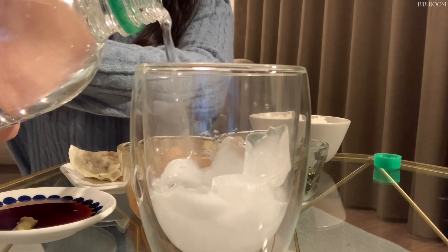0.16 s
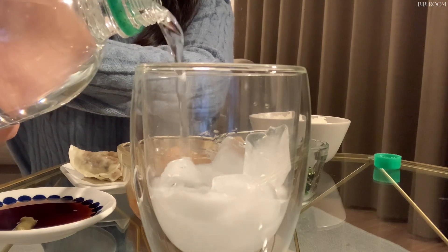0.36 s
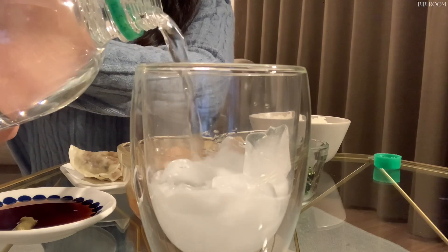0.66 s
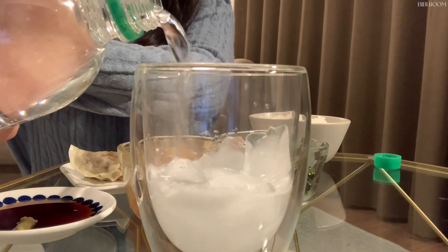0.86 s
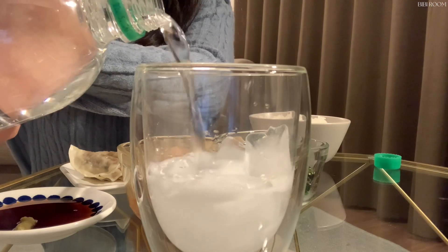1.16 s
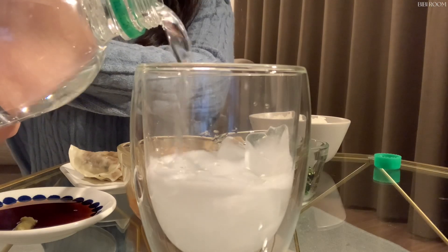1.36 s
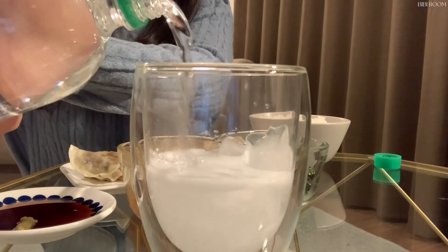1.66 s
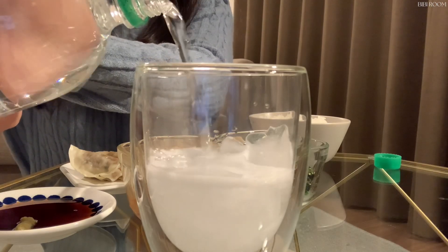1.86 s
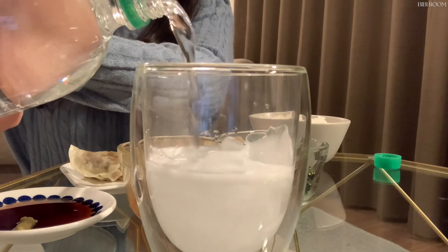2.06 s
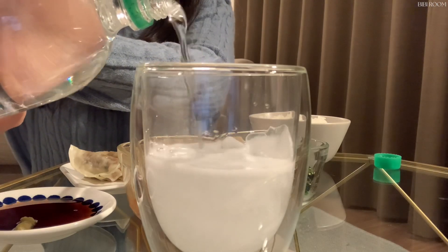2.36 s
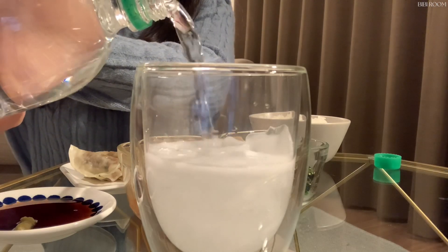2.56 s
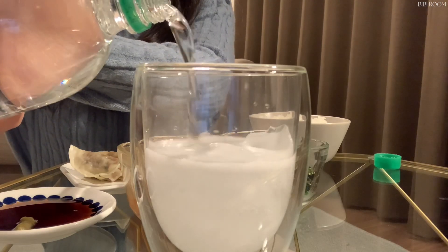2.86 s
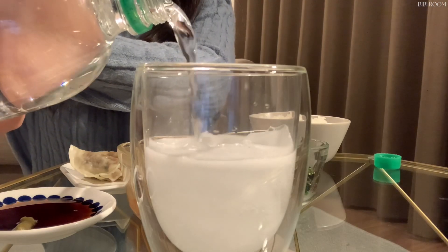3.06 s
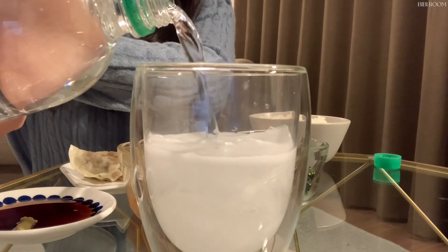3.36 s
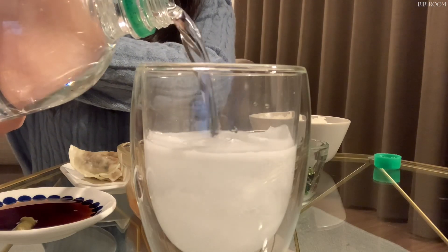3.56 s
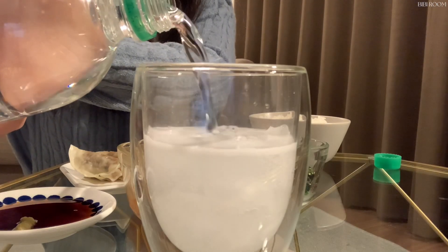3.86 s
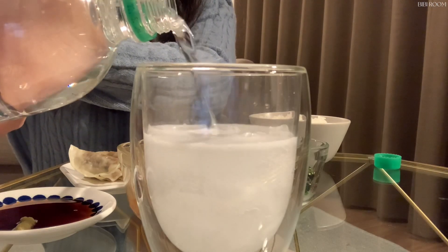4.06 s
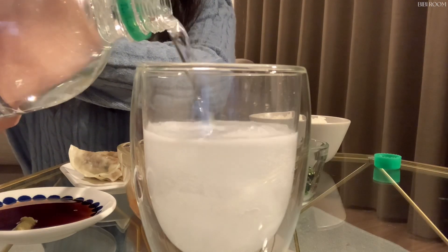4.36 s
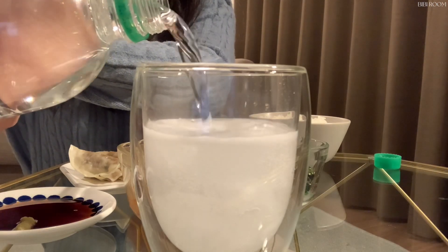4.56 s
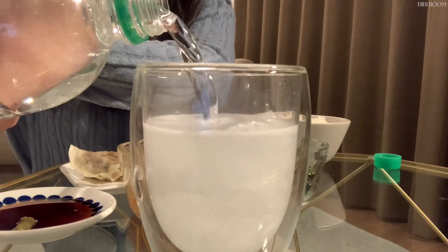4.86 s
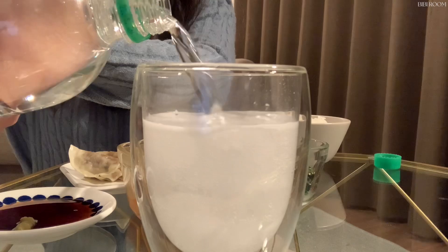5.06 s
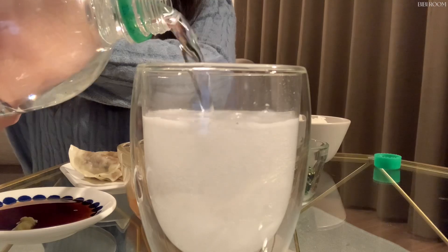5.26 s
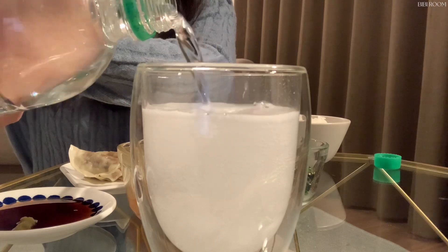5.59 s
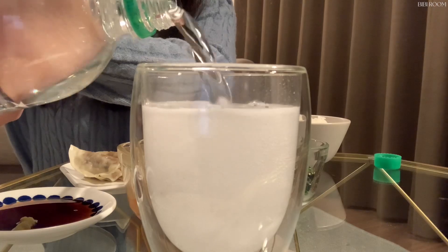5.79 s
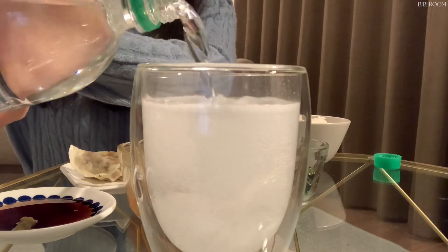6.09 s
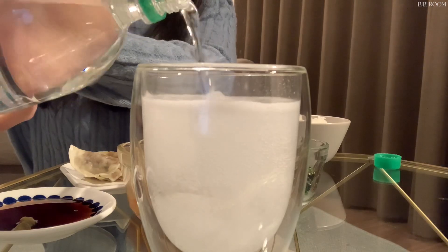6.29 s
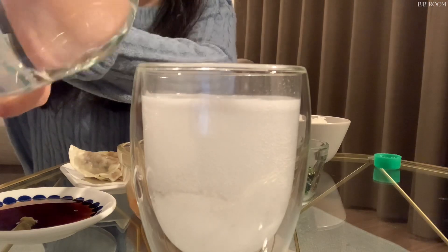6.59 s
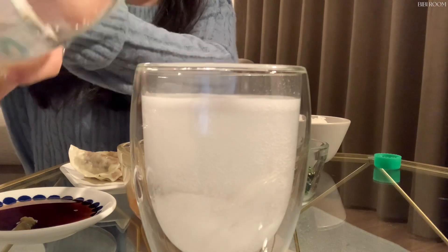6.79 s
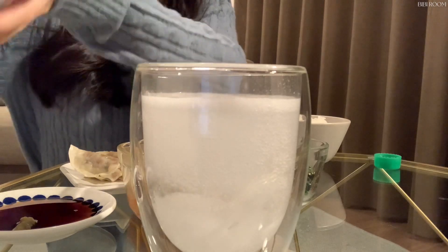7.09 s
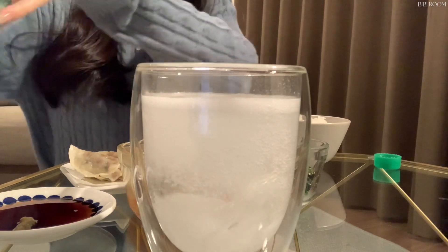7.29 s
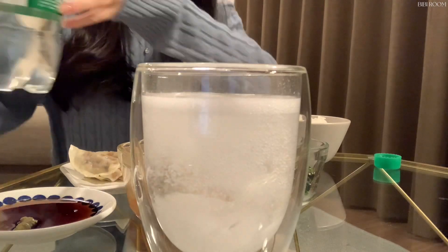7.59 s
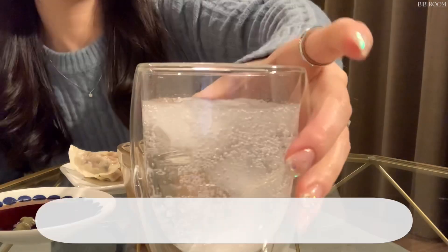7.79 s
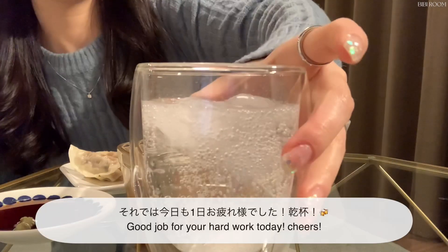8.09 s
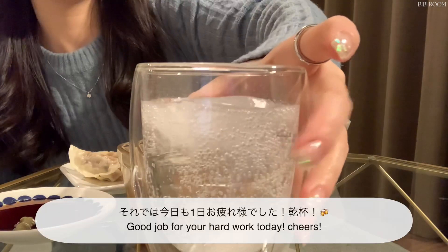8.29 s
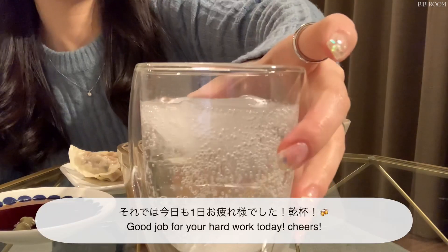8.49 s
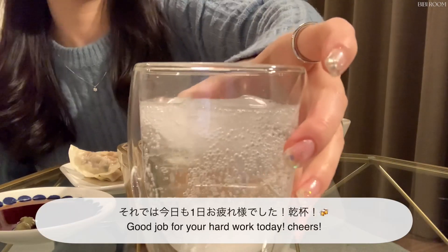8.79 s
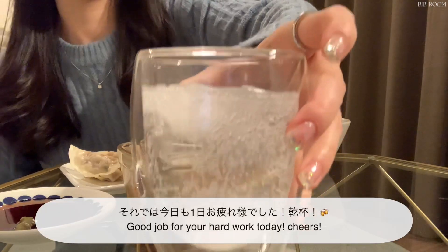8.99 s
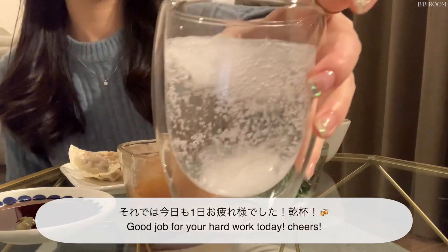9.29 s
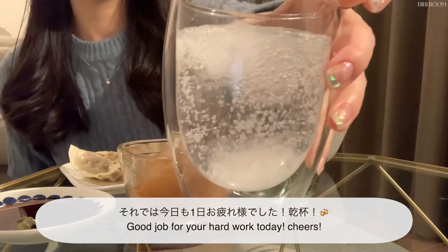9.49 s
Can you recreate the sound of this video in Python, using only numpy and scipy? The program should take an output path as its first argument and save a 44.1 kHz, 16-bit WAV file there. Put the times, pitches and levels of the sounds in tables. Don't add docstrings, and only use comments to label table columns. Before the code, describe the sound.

A steady, bright fizz surrounds the microphones as carbonated water is poured into an iced glass indoors. The splash strengthens and brightens, bottle gulps bubble underneath, and ice clunks irregularly, hardest just before the pour ends. Foam keeps seething briefly, then an abrupt cut leaves little but low room drone, a few damped glass clinks from gripping fingers, a slight skin rustle and delicate crackling bubbles.

```python
import sys
import numpy as np
from scipy import signal
from scipy.fft import rfft, irfft, next_fast_len
from scipy.io import wavfile
from scipy.ndimage import uniform_filter1d, map_coordinates

SR = 44100
rng = np.random.default_rng(int(sys.argv[2]) if len(sys.argv) > 2 else 0)


def attenuation_scalar(level_db):
    decades = np.asarray(level_db, float) / 20
    return 10 ** decades


def to_wav(sig):
    pcm = np.clip(np.atleast_2d(sig), -1, 1) * 32767
    pcm = np.round(pcm).astype(np.int16)
    wavfile.write(sys.argv[1], SR, pcm.T)


N = 425124
CHANGE_S = 7.697


# time_s, depth_tone_hz, width_hz
AIR_SPACE = [(0, 1070, 340), (1.5, 1220, 330), (3, 1250, 440), (4.5, 1520, 580), (5.5, 1780, 950),
             (6.4, 1970, 1320), (7.7, 1560, 1300)]
# pitch_hz, width_hz, level_db, share of the depth tone (0-1)
CROSS_TONES = [(2693, 232, 2.5, 0.64), (3006, 350, -4, 1), (4425, 193, -4.5, 0.58)]
# pitch_hz, level_db
FOAM_SPECTRUM = [(900, -22), (1800, -9), (2400, -13.5), (3600, 6.5), (5300, -3.5), (6300, 2.5), (7400, 0),
                 (8000, -5), (8700, -.5), (9300, -3), (10200, -1.5), (11300, -10), (12500, -15.5),
                 (13500, -18.5)]
# pitch_hz, level_db
SPRAY_SPECTRUM = [(6500, -20), (7400, -3), (8000, -8), (8800, -1), (10000, -3), (11500, -5), (12800, -5),
                  (14000, 0), (15000, -1), (16000, -1)]


def fizz():
    depth_db, cross_db, foam_db, spray_db = strengths()
    s, hz, width = np.transpose(AIR_SPACE)

    def depth(f, t):
        return peak(f, np.interp(t, s, hz), np.interp(t, s, width)) ** 1.3

    def cross(f, t):
        total = 0
        broadening = (np.interp(t, s, width) / width[0]) ** 0.43
        for k, (cross_hz, cross_width, db, share) in enumerate(CROSS_TONES):
            tone_hz = np.hypot(cross_hz, share * np.interp(t, s, hz))
            total = total + (-1) ** k * attenuation_scalar(db) * peak(f, tone_hz, cross_width * broadening)
        return total

    def foam(f, t):
        return attenuation_scalar(along(FOAM_SPECTRUM, f))

    def spray(f, t):
        return attenuation_scalar(along(SPRAY_SPECTRUM, f))

    splash_db = 0.9 * wobble(17)
    depth_db_now = depth_db + 5 + splash_db + 1.2 * wobble(40)
    cross_db_now = cross_db + 3.5 + splash_db + 0.84 * wobble(30)
    foam_db_now = foam_db + 7.5 + 0.48 * splash_db + 0.33 * wobble(10)
    spray_db_now = spray_db + 7.5 + 0.24 * splash_db + 0.8 * wobble(17)
    pair = attenuation_scalar(depth_db_now) * patchy(pops(900, spread_db=4.5, share=0.38), 1.3, depth)
    pair += attenuation_scalar(cross_db_now) * patchy(pops(1500, spread_db=1.0, share=0.62), 1.3, cross)
    pair += attenuation_scalar(foam_db_now) * patchy(pops(4000, spread_db=2.5, share=0.41), 2.37, foam)
    pair += attenuation_scalar(spray_db_now) * patchy(pops(3500, spread_db=1, share=0.78), 0.9, spray)
    pair[0] += pings(depth_db, cross_db, foam_db)
    return ports(*pair)


# time_s, plunging_stream_db, bursting_froth_db
FLOW_LEVELS = [(0, -59, -62), (.5, -57, -63.5), (1.2, -54.5, -62.5), (1.7, -51.5, -62), (2.1, -50, -59.5),
               (2.8, -50, -58.5), (3.8, -49.5, -57.5), (4.6, -49, -55), (5.44, -47, -55),
               (6.1, -50.5, -54.5), (6.5, -48.5, -53.5), (6.8, -53.5, -52.5), (7.5, -52, -54)]
# depth tone, cross tones, foam, spray [dB]
SETTLED_LEVELS = [-90, -99, -93, -82.5]
# peak_s, rise_s, fall_s, level_db
SLOSHES = [
    (8.23, 0.15, 0.089, -70),
    (8.3, 0.029, 0.027, -70),
    (8.3, .25, 0.28, -86.5),
    (8.58, 0.28, 0.14, -81),
]


def strengths():
    (stream_db, froth_db), hz = curves(FLOW_LEVELS), curves(AIR_SPACE)[0]
    depth_db = both(stream_db + 0.5 - 11 * np.log2(hz / hz[0]), froth_db - 2)
    melting_bed_db = -57.5 - 1.36 * np.arange(N) / SR
    swinging_bed_db = -58 + 1.4 * (froth_db - np.median(froth_db))
    foam_db = both(melting_bed_db, swinging_bed_db)
    settled = [both(db, surge(*jolt)) for db, jolt in zip(SETTLED_LEVELS, SLOSHES)]
    return takes([depth_db, stream_db, foam_db, froth_db], settled)


def pops(per_s, spread_db, share):
    chance = per_s / SR * takes(1, 0.45)
    burst = (rng.random((2, N)) < chance) / np.sqrt(chance)
    uneven_db = spread_db * np.minimum(rng.exponential(size=(2, N)), 2.2)
    size = rng.standard_normal((2, N)) * attenuation_scalar(uneven_db)
    return share * unit(burst * size) + np.sqrt(1 - share ** 2) * rng.standard_normal((2, N))


def patchy(x, patchy_db, response):
    f, t, z = signal.stft(x, SR, nperseg=1024)
    field = rng.standard_normal(z.shape[1:])
    field = uniform_filter1d(uniform_filter1d(field, size=8, axis=0), size=4, axis=1)
    z = z * response(f[:, None], t) * attenuation_scalar(patchy_db * unit(field))
    return unit(signal.istft(z, SR, nperseg=1024)[1][:, :N])


BUBBLE_HZ = [2030, 2870, 3500, 4550, 4440, 6250, 7030, 7230, 8970, 10300]


def pings(depth_db, cross_db, foam_db):
    draw = rng.random((1400, 5))
    start = (draw[:, 0] * (N - 700)).astype(int)
    mode = (draw[:, 1] * len(BUBBLE_HZ)).astype(int)
    hz = (np.array(BUBBLE_HZ)[mode] * (1 + 0.079 * (draw[:, 2] - 0.5)))[:, None]
    fizz_db = [depth_db[start] + 5.0, cross_db[start] - 4.5, foam_db[start] + 3.5]
    db = np.choose(np.digitize(mode, [1, 5]), fizz_db)
    db = db + 5 * (start > CHANGE_S * SR)
    db = db[:, None]
    t = np.arange(640) / SR
    ring = np.sin(2 * np.pi * hz * t * (1 + 3.4 * t)) * attenuation_scalar(-60 * t * hz / 45) * (1 - np.exp(-t / 0.0004))
    ring = ring * attenuation_scalar(db - 4.0 * np.log(draw[:, 3] + 0.074)[:, None])
    return np.bincount((start[:, None] + np.arange(len(t))).ravel(), ring.ravel(), N)


# start_s, level_db, pitch_hz
BOTTLE_GLUGS = [(0.225, -37, 296), (0.52, -42, 293), (0.756, -39, 268), (1.027, -46, 266),
                (1.273, -39, 263), (1.569, -38.5, 267), (1.914, -40, 265), (2.372, -39.5, 261),
                (2.78, -47, 303), (4.149, -42, 202), (5.168, -41, 187), (5.617, -38, 202),
                (5.963, -38.5, 209)]


def glugs():
    track = np.zeros(N)
    for s, db, hz in BOTTLE_GLUGS:
        add(track, s, attenuation_scalar(db + 3) * swell(0.914 * hz, life=0.0061, rise=0.033))
    return track


def swell(hz, life, rise):
    t = np.arange(6000) / SR
    return np.sin(2 * np.pi * hz * t * (1 + rise * t / life)) * t / life * np.exp(1 - t / life)


# start_s, level_db, pitch_hz, breadth_octaves
ICE_BLOWS = [(1.196, -30, 1080, 0.38), (1.754, -21.5, 1250, 0.64), (1.881, -39, 1480, 0.32),
             (2.095, -28.5, 1595, 0.89), (2.179, -29.5, 1670, .65), (2.201, -33.5, 1160, 0.96),
             (2.314, -28.5, 1200, .9), (2.728, -29, 1150, 0.49), (2.8, -23, 1290, 0.79),
             (2.858, -34, 1220, 0.71), (3.237, -28, 1400, 0.85), (3.27, -20.5, 1170, 0.85),
             (3.284, -27, 1210, 0.79), (3.396, -33, 1200, 0.7), (3.463, -28, 1340, 0.52),
             (3.658, -34, 990, 0.35), (3.684, -31, 1490, 1), (4.423, -31, 1230, .55),
             (4.728, -30, 1210, 0.52), (4.779, -23.5, 1390, 0.67), (4.849, -31.5, 1780, 1),
             (4.909, -31.5, 1250, 0.54), (5.452, -34, 1840, 1), (5.526, -33, 2100, 0.29),
             (5.699, -18, 1300, 0.93), (5.888, -13, 1600, 0.96), (6.33, -27, 1650, .95),
             (6.39, -27, 1090, .4), (6.46, -32, 1840, 1), (6.529, -30, 2060, 1)]


def ice_knocks():
    track = np.zeros(N)
    for s, db, hz, octaves in ICE_BLOWS:
        t60 = 0.021 / octaves ** 0.7
        add(track, s, attenuation_scalar(db + 2.5) * knock(hz, t60, octaves))
        add(track, s + 0.015, attenuation_scalar(db - 14 - 5 * octaves) * knock(hz, t60, octaves))
    return track


WALL_MODES_HZ = [723, 984, 1200, 1474, 1780, 2100, 2285, 2993, 3430, 4630]


def knock(hz, t60, octaves):
    t = np.arange(2048) / SR
    count = len(WALL_MODES_HZ)
    modes = np.array(WALL_MODES_HZ)[:, None] * (1 + 0.05 * rng.standard_normal((count, 1)))
    db = -6.5 * (np.log2(modes / hz) / max(octaves, 0.15)) ** 2 + rng.normal(0, 1.0, modes.shape)
    since = np.maximum(t - 0.000867 * (1200 / modes - 0.4), 0)
    ring = attenuation_scalar(db - 60 * since / t60) * np.sin(2 * np.pi * modes * since) * (1 - np.exp(-since / 0.000855))
    return ring.sum(0) / abs(ring.sum(0)).max()


# start_s, level_db, middle_modes_db, high_modes_db, bright_tick_db
RING_TAPS = [(7.997, -66, -6, -4, -14), (8.007, -40, -12, -10.5, -19), (8.085, -43.5, -16, -27, -20),
             (8.136, -31.5, -24, -24.5, -14), (8.147, -41, -9, -10, -19), (8.192, -40.5, -13, -29, -28),
             (8.248, -50.5, -11, -29, -15), (8.285, -60, -19, -19, -36), (8.288, -42, -22, -19, -37),
             (8.297, -44.5, -26, -12, -30), (8.496, -59, -19, -28, -24), (9.31, -66, -18, -40, -40)]


def ring_taps():
    track = np.zeros(N)
    for s, db, middle_db, high_db, tick_db in RING_TAPS:
        add(track, s, attenuation_scalar(db + 3.5) * clink(middle_db, high_db))
        add(track, s, attenuation_scalar(db + tick_db + 10) * tick(7000, width=0.37))
    return track


# pitch_hz, level_db, t60_s
GLASS_MODES = [(770, -7, .016), (1000, 12, 0.013), (1200, 5, 0.015), (1520, -0.5, 0.0087),
               (4640, -34.5, 0.0056)]


def clink(middle_db, high_db):
    t = np.arange(2048) / SR
    bend = t + 0.00022 * (1 - np.exp(-t / 0.00039))
    middle = [(2000, middle_db + 3, 0.01), (2380, middle_db + 7, 0.018)]
    high = [(3250, high_db + 9, 0.013), (3600, high_db + 11, 0.013)]
    ring = np.zeros(len(t))
    for hz, db, t60 in GLASS_MODES + middle + high:
        decay = attenuation_scalar(db + rng.normal(0, 2.1) - 60 * t / t60)
        ring += decay * np.sin(2 * np.pi * hz * rng.normal(1, 0.034) * bend)
    ring *= 1 - np.exp(-t / 0.00082)
    return ring / abs(ring).max()


# start_s, level_db, pitch_hz
SNAPS = [(3.2292, -37, 5540), (4.6664, -50, 3070), (5.4562, -34.5, 3100), (6.07, -29.5, 5200),
         (7.8293, -66, 2300), (7.889, -66, 4640), (7.9147, -64, 14100), (8.3779, -65, 4720),
         (8.3994, -65, 4550), (8.5545, -63, 13700), (8.569, -56.5, 13600), (8.6448, -66, 12400),
         (8.749, -62, 7460), (8.869, -55, 13300), (8.991, -67, 14700), (9.2324, -71, 14300),
         (9.276, -68, 11000), (9.616, -61, 6990)]


def bubble_snaps():
    track = np.zeros(N)
    for s, db, hz in SNAPS:
        noise_share = 0.4 * hz / 6000 + 0.38 * attenuation_scalar(db + 29.5) ** 2
        add(track, s, attenuation_scalar(db - 4.5) * tick(hz, noise_share))
    return track


def tick(hz, width):
    t = np.arange(512) / SR
    return (np.sin(2 * np.pi * hz * t) + width * rng.standard_normal(len(t))) * attenuation_scalar(-60 * t / 0.0098)


# peak_s, rise_s, fall_s, level_db
GRIP_SURGE = (8.4, .14, .14, -82)
# pitch_hz, width_hz, level_db
SKIN_TONES = [(3160, 200, -10.5), (4660, 330, 1), (7220, 300, 1), (8870, 350, -5.5), (10530, 370, -10)]


def grip():
    def tones(f):
        return sum(attenuation_scalar(db) * peak(f, hz, width) ** 2 for hz, width, db in SKIN_TONES)

    slip_db = both(surge(*GRIP_SURGE), -104) + 4.2 * wobble(45) + 2.8 * wobble(9)
    slip = attenuation_scalar(slip_db) * takes(0, 1)
    return ports(*(slip * unit(filtered(rng.standard_normal((2, N)), tones))))


# start_s, level_db, pitch_hz, rise_s
HAND_THUMPS = [
    (8.023, -36, 60.2, 0.013),
    (8.105, -42, 68.4, 0.014),
]


def thumps():
    track = np.zeros(N)
    for s, db, hz, life in HAND_THUMPS:
        add(track, s, attenuation_scalar(db - 2) * swell(hz, life, rise=0.013))
    return track


# pitch_hz, t60_s
ROOM_DECAY = [(300, 0.34), (2000, 0.13), (10000, 0.27)]


def walls(x):
    hz, t, z = signal.stft(rng.standard_normal((2, SR // 2)), SR, nperseg=256)
    tail = signal.istft(z * attenuation_scalar(-60 * t / along(ROOM_DECAY, hz)[:, None]), SR, nperseg=256)[1]
    delayed = np.pad(x, (200, 0))[None]
    return signal.fftconvolve(delayed, tail / np.linalg.norm(tail[0]), axes=1)[:, :N]


# pitch_hz, width_hz, level_db
ROOM_MODES = [(41.7, 13, -7), (66.6, 15.3, -1), (75.7, 11.8, -5.5)]
# time_s, level_db
DRONE_SWELLS = [(0, -45), (.6, -49), (1.63, -47.5), (1.93, -52), (2.78, -42.5), (3.21, -50), (3.57, -48),
                (3.94, -43.5), (4.1, -50), (4.58, -51), (5.1, -44), (5.48, -56.5), (5.68, -41),
                (6.02, -51.5), (6.4, -42), (6.87, -50), (7.43, -42), (7.69, -50.5)]
# pitch_hz, density_db (per Hz)
AIR_SPECTRUM = [(53, -40.5), (90, -0.5), (107, -8.5), (139, -3), (184, -12), (225, -8.5), (248, -15),
                (298, -14), (406, -12), (441, -11.5), (474, -14), (1040, -18), (2600, -47.5), (3380, -72),
                (5720, -120)]
# pitch_hz, width_hz, level_db
RUSH_TONES = [(136.5, 14, 2), (291, 74, 2)]


def room():
    t, noise = np.arange(N) / SR, rng.standard_normal((2, 2, N))
    drone_db = takes(curves(DRONE_SWELLS)[0], -53.5 - 2.5 * (t - CHANGE_S))
    air_db = takes(-49.5 + 0.46 * t, -59) + 0.75 * wobble(6)

    def modes(f):
        return sum(attenuation_scalar(db) * peak(f, hz, width) ** 2 for hz, width, db in ROOM_MODES)

    def colour(f):
        tones = sum(attenuation_scalar(db) * abs(peak(f, hz, width)) ** 2 for hz, width, db in RUSH_TONES)
        return attenuation_scalar(along(AIR_SPECTRUM, f)) * (1 + tones)

    drone = attenuation_scalar(drone_db + 0.47) * unit(filtered(noise[0], modes))
    air = attenuation_scalar(air_db + 1.1) * unit(filtered(noise[1], colour))
    return ports(*(drone + air))


# pitch_hz, lead_rad
PORT_LEAD = [(0, 0), (300, -.3), (900, -1.7), (1550, -1.2), (2300, -2.8), (3200, -3), (4000, -4.3),
             (4600, -4.1), (5450, -5.7), (6000, -4.7), (7000, -4.3), (8000, -3.2), (10000, -3.1),
             (12900, 0)]
# pitch_hz, coherence (0-1)
PORT_COHERENCE = [(60, 1), (250, 0.69), (500, 0.43), (1200, 0.15), (2800, 0.67), (5000, 0.31), (7000, 0.62),
                  (8000, 0.81), (10000, 0.79), (11500, 0.49), (13000, .93)]
# pitch_hz, level_db
PORT_TILT = [(60, 6), (130, 2.5), (290, 3.5), (640, 0), (1410, -1.5), (3100, -2.5), (6820, -1.5),
             (15000, -0.5)]


def ports(near, far):
    def turn(f):
        return np.arccos(np.clip(along(PORT_COHERENCE, f), 0, 1)) / 2

    def shift(f):
        return attenuation_scalar(along(PORT_TILT, f) / 2) * np.exp(0.5j * along(PORT_LEAD, f))

    shared = filtered(near, lambda f: np.cos(turn(f)))
    unshared = filtered(far, lambda f: np.sin(turn(f)))
    pair = np.array([shared + unshared, shared - unshared])
    return filtered(pair, lambda f: shift(f) ** np.array([[1], [-1]]))


def peak(f, hz, width):
    return 1j * f * width / (hz * hz - f * f + 1j * f * width + 1e-9)


def filtered(x, response):
    m = next_fast_len(N + 8192)
    return irfft(rfft(x, m) * response(np.fft.rfftfreq(m, 1 / SR)), m)[..., :N]


def both(*db):
    return 10 * np.log10(sum(attenuation_scalar(d) ** 2 for d in db))


def surge(s, rise, fall, db):
    t = np.arange(N) / SR - s
    return np.maximum(db - 4.34 * (t / np.where(t < 0, rise, fall)) ** 2, -140)


def wobble(rate):
    return map_coordinates(rng.standard_normal(int(N * rate / SR) + 4), [np.arange(N) * rate / SR])


def unit(x):
    return x / np.sqrt(np.mean(x ** 2) + 1e-20)


def along(points, hz):
    f, v = np.transpose(points)
    return np.interp(np.log(hz + 1), np.log(f + 1), v)


def curves(rows):
    s, *cols = np.transpose(rows)
    return [np.interp(np.arange(N) / SR, s, c) for c in cols]


def takes(before, after):
    return np.where(np.arange(N) < CHANGE_S * SR, before, after)


def add(track, s, sound):
    start = round(s * SR)
    track[start:start + len(sound)] += sound[:len(track) - start]


def scene():
    hits = ice_knocks() + glugs() + thumps()
    snaps = ring_taps() + bubble_snaps()
    direct = ports(hits + snaps, 3.67 * np.roll(snaps, shift=11))
    echo = attenuation_scalar(-8.5) * ports(*walls(hits + 1.3 * snaps))
    return fizz() + grip() + direct + echo + room()


def band_limit(x):
    return signal.sosfilt(signal.butter(12, 16470, fs=SR, output="sos"), x)


def record(dry):
    return band_limit(dry)


dry = scene()
out = record(dry)
to_wav(out)
```